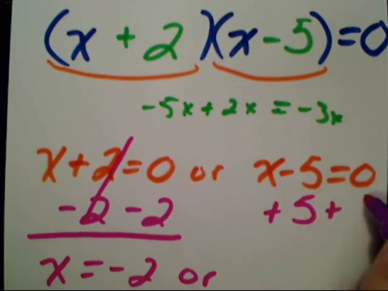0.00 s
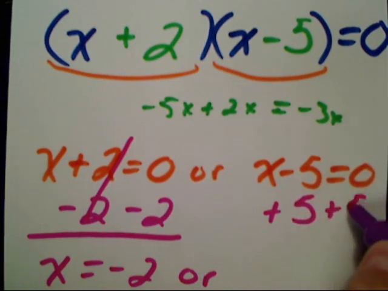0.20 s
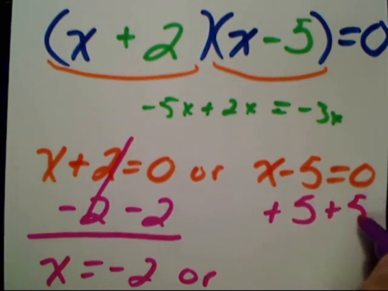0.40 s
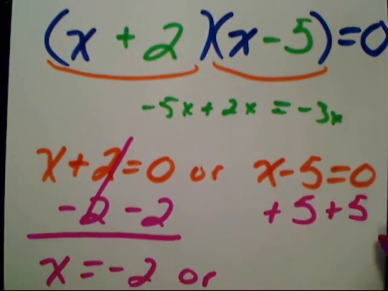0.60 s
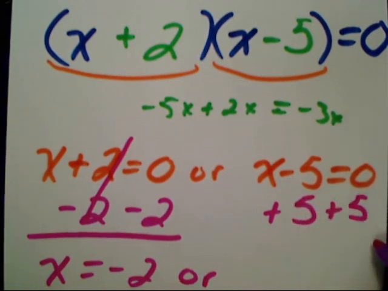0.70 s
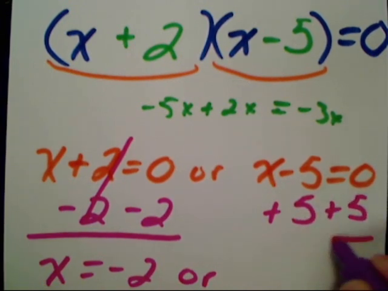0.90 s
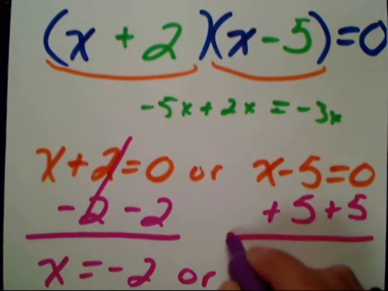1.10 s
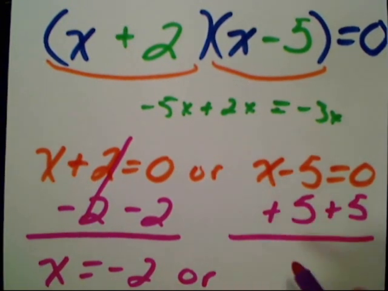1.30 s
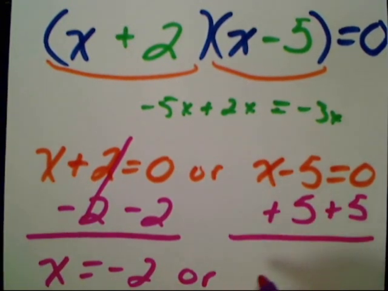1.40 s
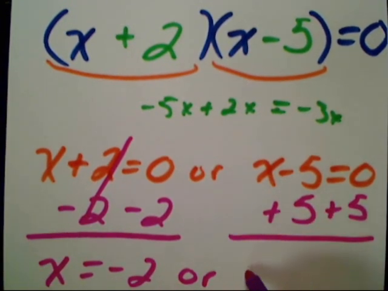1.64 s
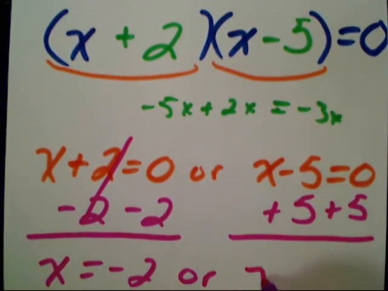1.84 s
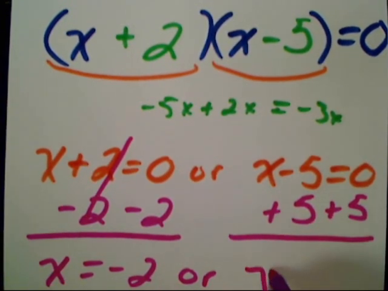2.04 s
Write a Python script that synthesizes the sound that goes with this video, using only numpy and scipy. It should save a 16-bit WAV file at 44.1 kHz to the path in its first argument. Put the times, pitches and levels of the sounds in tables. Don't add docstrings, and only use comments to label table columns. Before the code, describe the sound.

A felt-tip marker scratches one long loud hissy stroke on paper, then four shorter, quieter strokes with small taps as the nib lands; close mono microphone in a quiet room with low fan hum.

```python
import sys
import numpy as np
from scipy import signal
from scipy.fft import rfft, irfft, next_fast_len
from scipy.io import wavfile
from scipy.ndimage import uniform_filter1d, map_coordinates

SR = 44100
rng = np.random.default_rng(int(sys.argv[2]) if len(sys.argv) > 2 else 0)


def to_wav(s):
    ch = np.atleast_2d(s).T
    pcm = np.round(np.clip(ch, -1, 1) * 32767)
    wavfile.write(sys.argv[1], SR, pcm.astype(np.int16))


def linear_from_db(decibels):
    return 10 ** (np.asarray(decibels, float) / 20)


N = 92610


def unit(x):
    return x / np.sqrt(np.mean(x ** 2) + 1e-20)


def filtered(x, response):
    m = next_fast_len(N + SR // 2)
    return irfft(rfft(x, m) * response(np.fft.rfftfreq(m, 1 / SR)), m)[:N]


def ringing(modes):
    def response(f):
        total = 0
        for k, (hz, width_hz, db) in enumerate(modes):
            damping = 1j * f * width_hz
            total = total + (-1) ** k * linear_from_db(db) * damping / (hz * hz - f * f + damping)
        return total
    return response


def coloured(points):
    hz, db = np.transpose(points)
    noise = rng.standard_normal(N)
    return unit(filtered(noise, lambda f: linear_from_db(np.interp(np.log(f + 1), np.log(hz + 1), db))))


def motion(rows):
    s, db, bright_db = np.transpose(rows)
    t = np.arange(N) / SR
    return np.interp(t, s, db, left=-120, right=-120), np.interp(t, s, bright_db)


def wobble(rate):
    knots = rng.standard_normal(int(N * rate / SR) + 4)
    return map_coordinates(knots, [np.arange(N) * rate / SR])


def tilted(x, bright_db):
    split_hz, wander_db = 8200, 1.5
    z = signal.stft(x, nperseg=256)[2]
    patches = uniform_filter1d(rng.standard_normal(z.shape), size=2, axis=0)
    patches = uniform_filter1d(patches, size=16, axis=1)
    x = signal.istft(z * linear_from_db(wander_db * unit(patches)), nperseg=256)[1][:N]
    low = filtered(x, lambda f: 1 / (1 + (f / split_hz) ** 8))
    return unit(low * linear_from_db(-bright_db / 2) + (x - low) * linear_from_db(bright_db / 2))


# f/Hz, level/dB, width/Hz
FAN_LINES = [(27.6, -47, 2.9), (52.36, -48, 1.23), (58.4, -48, 5.2), (76.6, -51.5, 4.1), (96.6, -52, 4.3),
             (163, -67, 32), (205.6, -64.5, 7.6), (240.5, -62, 5.8), (264.4, -63, 6.5), (283.5, -64, 9.3),
             (351.4, -68.5, 5.5)]


def fan():
    out = np.zeros(N)
    for hz, db, width_hz in FAN_LINES:
        noise = rng.standard_normal(N)
        out += linear_from_db(db) * unit(filtered(noise, lambda f: 1 / (1 + ((f - hz) / width_hz) ** 4)))
    return out


def tone(hz, db):
    t = np.arange(N) / SR
    return np.sqrt(2) * linear_from_db(db) * np.sin(2 * np.pi * (hz * t + rng.random()))


def mains():
    return tone(119.3, -45.5 + 1 * (wobble(4.6) + wobble(22.4)))


# f/Hz, level/dB, sway/dB
WHINE = [(710.6, -72, 1), (1863, -70.5, .5), (2767, -80, 1.5), (3725, -73, .5), (5588, -77, .5),
         (7450, -80, 1), (12489, -76, 1)]


def whine():
    t = np.arange(N) / SR
    out = sum(tone(hz, db + sway_db * (wobble(3.97) + wobble(40.7))) for hz, db, sway_db in WHINE)
    drone_s, drone_half_s = .8, .3
    out += tone(708, -65 + wobble(8.2)) * np.exp(-.5 * ((t - drone_s) / drone_half_s) ** 2)
    sag_db, sag_s, sag_half_s = 2, 0.7, .2
    sag = sag_db * np.exp(-((t - sag_s) / sag_half_s) ** 4)
    return out + tone(8000, -67 + .5 * wobble(12.2) - sag)


# f/Hz, level/dB per Hz
AIR = [(12, -20), (40, -21), (125, -11.5), (180, -22.5), (260, -20.5), (500, -25), (715, -38.5),
       (1100, -50), (2000, -58)]
# f/Hz, level/dB per Hz
HISS = [(590, 4.5), (1000, -1), (1820, -3), (2370, -6.5), (6800, -12.5), (7720, -21), (8460, -12),
        (15600, -14)]


def room_tone():
    air_db, hiss_db = -53, -58
    return fan() + mains() + whine() + linear_from_db(air_db) * coloured(AIR) + linear_from_db(hiss_db) * coloured(HISS)


def room(x):
    t60_s = 0.15
    t = np.arange(SR // 3) / SR
    tail = rng.standard_normal(len(t)) * linear_from_db(-60 * t / t60_s)
    return signal.fftconvolve(x, tail / np.linalg.norm(tail))[:N]


# t/s, level/dB, brightness/dB
SLIDES = [
    [(0, -55.5, 3), (.04, -53.5, 2), (.105, -65, -3), (.15, -69.5, 0), (.195, -64, -2), (.215, -54, 1)],
    [(.49, -54, -7), (.56, -64.5, -12), (.65, -60.5, 7), (.72, -60, -4), (.76, -53.5, -0.5), (.82, -51, 2),
     (.855, -63.5, -3)],
    [(1.04, -84, 0), (1.07, -61, -1), (1.11, -69, 0)],
    [(1.56, -59, -8), (1.59, -61.5, -6), (1.65, -54, 0), (1.69, -69, -6)],
    [(1.985, -49, 0), (2.0, -53.5, -2), (2.05, -48.5, 1), (2.1, -53, -1)],
]
# f/Hz, level/dB per Hz
SKIN = [(1470, -8), (2500, -6.5), (2980, -9), (5010, -2), (7070, -5.5), (9980, -1), (12200, -1.5),
        (15600, -8)]


def hand():
    return sum(linear_from_db(db) * tilted(coloured(SKIN), bright_db) for db, bright_db in map(motion, SLIDES))


# t/s, peak level/dB, tick level against the thud/dB
TAPS = [
    (0.171, -54, 6),
    (1.075, -38.5, -8),
    (1.416, -60, 13),
    (1.419, -34, -9),
    (1.441, -53, 11),
    (1.732, -62, 8),
    (1.735, -32.5, -11),
    (1.921, -51, 6),
    (1.924, -36.5, -10),
]
# f/Hz, width/Hz, level/dB
DESK = [(186, 70, 0), (506, 280, 5), (1050, 500, -1), (1650, 700, -1)]


def taps():
    push_db, push_t60_s, tick_t60_s = 6.5, 0.0013, 0.022
    tick_low_hz, tick_top_hz = 5000, 13400
    push, ticks = np.zeros(N + SR), np.zeros(N + SR)
    t = np.arange(SR // 50) / SR
    for s, db, tick_db in TAPS:
        here = slice(round(s * SR), round(s * SR) + len(t))
        push[here] += linear_from_db(db + push_db - 60 * t / push_t60_s)
        ticks[here] += linear_from_db(db + tick_db - 60 * t / tick_t60_s) * rng.standard_normal(len(t))
    thud = filtered(push[:N], ringing(DESK))
    scuff = filtered(ticks[:N], lambda f: f * f / (f * f + tick_low_hz ** 2) / (1 + (f / tick_top_hz) ** 4))
    return thud + scuff


def catches():
    per_s, spread_db, clump_db = 26000, 1.5, .3
    hit = rng.random(N) < per_s / SR
    strength_db = spread_db * rng.standard_normal(N) + clump_db * wobble(330)
    return hit * rng.choice([-1, 1], N) * linear_from_db(strength_db)


# t/s, half length/s, f/Hz, width/Hz, level/dB
SWELLS = [(0.26, .03, 14200, 1500, -46), (.24, 0.018, 5600, 460, -50), (0.313, 0.031, 5300, 330, -40.5),
          (1.5, 0.023, 1397, 150, -50.5), (1.49, 0.042, 720, 280, -58.5), (1.49, .025, 14800, 1500, -53),
          (1.145, 0.012, 4600, 990, -50.5), (0.27, .04, 9600, 400, -34), (0.29, 0.033, 7220, 200, -40.5),
          (.28, .04, 11000, 400, -46), (0.4, .04, 8500, 400, -35.5), (0.41, .035, 12050, 400, -36),
          (0.33, 0.051, 1040, 130, -58), (0.36, 0.025, 1800, 90, -61), (0.42, 0.034, 1400, 90, -54.5),
          (0.41, 0.035, 1800, 120, -55.5), (0.42, .04, 2280, 160, -52.5), (0.41, 0.036, 3290, 200, -50),
          (0.458, 0.017, 510, 71, -53), (1.128, 0.023, 1070, 57, -52.5), (1.142, 0.011, 8800, 350, -47.5),
          (1.2, 0.014, 14400, 600, -54), (1.203, .025, 2700, 120, -62), (1.227, .02, 4670, 180, -48.5),
          (1.47, 0.008, 10000, 500, -38.5), (1.493, .012, 8900, 760, -41), (1.499, 0.0091, 5860, 300, -38),
          (1.505, 0.01, 4030, 220, -48), (1.55, .012, 5900, 900, -57), (1.779, 0.015, 5250, 300, -49),
          (1.954, 0.0065, 4300, 350, -50.5), (1.8, 0.016, 2100, 1400, -62), (1.975, .01, 4500, 600, -54),
          (1.967, .009, 5500, 370, -47), (1.966, 0.0073, 9100, 600, -42.5), (1.985, 0.011, 6500, 1000, -50)]


def swells():
    contact_db = 17
    t, fibres = np.arange(N) / SR, catches()
    contact = sum(np.minimum(linear_from_db(db - db.max() + contact_db), 1) for db, _ in map(motion, STROKES))
    out = np.zeros(N)
    for s, half_s, hz, width_hz, db in SWELLS:
        mode = unit(filtered(fibres, lambda f: ringing([(hz, width_hz, 0)])(f) ** 2))
        out += linear_from_db(db) * np.exp(-.5 * ((t - s) / half_s) ** 2) * mode
    return contact * out


# t/s, level/dB, brightness/dB
STROKES = [
    [(.21, -50, 6), (.224, -35.5, -14), (.26, -28, -4.5), (.32, -24, 1.5), (.39, -21.5, 2.5),
     (.43, -23.5, -0.5), (.465, -29.5, -4), (.485, -41, -12), (.5, -68, 6)],
    [(1.111, -62, -11), (1.119, -46, 3.5), (1.135, -39.5, 5), (1.155, -35.5, 5.5), (1.172, -44.5, -5),
     (1.19, -43.5, -4), (1.225, -38.5, -0.5), (1.27, -43.5, -4), (1.295, -53.5, 1), (1.312, -72, 2)],
    [(1.451, -55, 3), (1.456, -33.5, 4.5), (1.47, -33, 5), (1.5, -32, 6), (1.515, -39, -3),
     (1.525, -45.5, -6), (1.545, -51.5, -8), (1.565, -67, -14)],
    [(1.754, -57, -6), (1.76, -37, 0), (1.775, -36.5, 2.5), (1.798, -44, 10), (1.812, -55, -3),
     (1.828, -68, -17)],
    [(1.942, -56, -7.5), (1.947, -43, -5), (1.957, -36.5, 0), (1.97, -38, 5), (1.98, -50, 10),
     (2.0, -66, 1)],
]
# f/Hz, width/Hz, level/dB
RINGS = [
    [(4000, 790, -12.5), (4670, 330, -12), (5330, 220, -9), (6220, 980, -16.5), (7200, 370, -7),
     (8200, 810, -12), (10360, 800, -2.5), (12700, 630, -8.5), (14100, 2900, -18.5)],
    [(4240, 580, -0.5), (5000, 680, -1), (6170, 840, -5), (7400, 1150, -7.5), (9560, 750, -2.5),
     (11100, 1400, -9.5), (13600, 2700, -15.5)],
    [(4620, 280, -1.5), (5180, 370, -6.5), (6130, 470, -2), (7050, 290, -2), (7660, 920, -8),
     (9630, 760, -3), (10650, 400, -3.5), (11900, 1800, -10.5), (14500, 2100, -17)],
    [(3000, 660, -16), (4340, 300, -1), (5440, 490, -4), (7040, 590, -6), (9500, 920, -6),
     (10900, 600, -6.5), (12300, 1700, -14.5)],
    [(3050, 670, -3.5), (4320, 520, -1), (5470, 550, -2.5), (6850, 640, -7), (9160, 1100, -5),
     (10600, 940, -4), (12900, 2600, -12)],
]
# level against the stroke's peak/dB, main f/Hz, width/Hz, its level/dB
SHEET = [
    (-24.5, 1480, 360, -0.5),
    (-10.5, 1290, 230, 0),
    (-14.5, 1400, 210, 2),
    (-12, 2400, 560, -1),
    (-14, 2300, 460, -0.5),
]
# f/Hz, width/Hz, level/dB
SHEET_MODES = [(516, 112, -2), (1020, 194, -4), (2300, 2320, -6)]
# f/Hz, level against the stroke/dB
BENDS = [
    (5720, -5),
    (4100, -12.5),
    (4700, -13.5),
    (5250, -17),
    (4300, -4.5),
]


def marker():
    bend_width_hz, bend_fade_db_per_s = 600, 178
    sheet_grows = 0.51
    out, t = np.zeros(N), np.arange(N) / SR
    for rows, ring, (sheet_db, *main), (bend_hz, bend_db) in zip(STROKES, RINGS, SHEET, BENDS):
        db, bright_db = motion(rows)
        fibres = catches()
        sheet = unit(filtered(fibres, ringing(sorted(SHEET_MODES + [tuple(main)]))))
        sheet_gain = linear_from_db(db.max() + sheet_db + sheet_grows * (db - db.max())) * (db > -119)
        rung = filtered(fibres, ringing(ring))
        nib = tilted(filtered(rung, lambda f: f * f / (f * f + 2500 ** 2)), bright_db)
        bend = unit(filtered(fibres, lambda f: ringing([(bend_hz, bend_width_hz, 0)])(f) ** 2))
        fade_db = bend_fade_db_per_s * np.abs(t - rows[1][0])
        out += linear_from_db(db) * (nib + linear_from_db(bend_db - fade_db) * bend) + sheet_gain * sheet
    return out


def scene():
    echo_db = -15
    near = marker() + swells() + taps() + hand()
    return np.tile(near + linear_from_db(echo_db) * room(near) + room_tone(), (2, 1))


def low_pass(x):
    return signal.sosfilt(signal.butter(12, 15700, fs=SR, output="sos"), x)


def record(dry):
    top_hz, offset = 15740, .0079
    wet = np.array([filtered(v, lambda f: f < top_hz) for v in dry])
    return low_pass(wet + offset)


dry = scene()
out = record(dry)
to_wav(out)
```